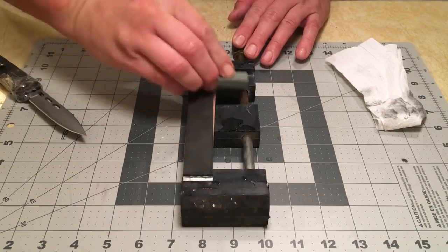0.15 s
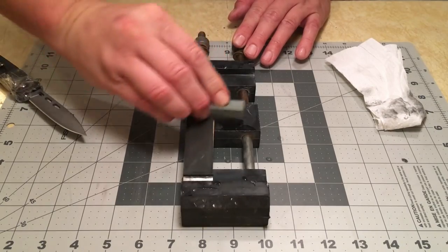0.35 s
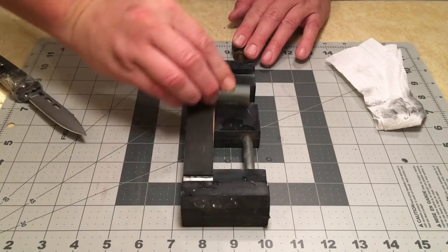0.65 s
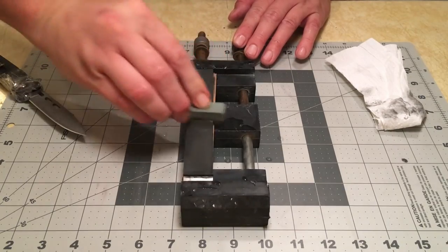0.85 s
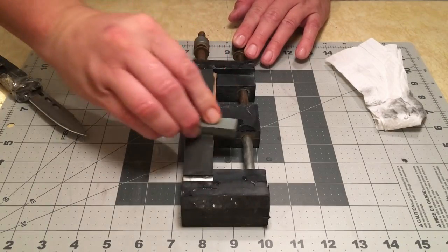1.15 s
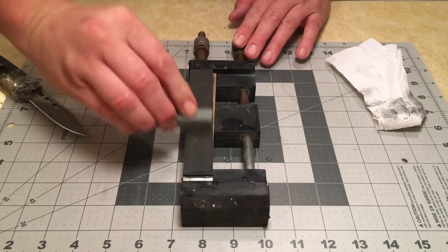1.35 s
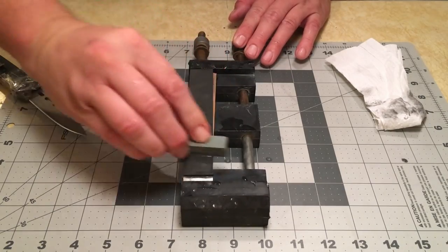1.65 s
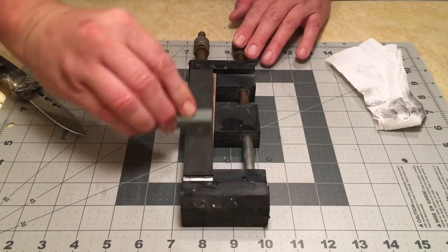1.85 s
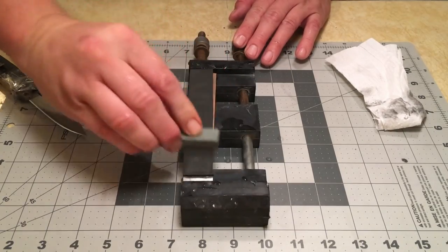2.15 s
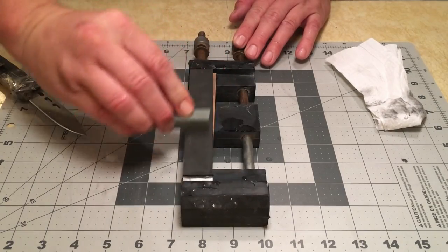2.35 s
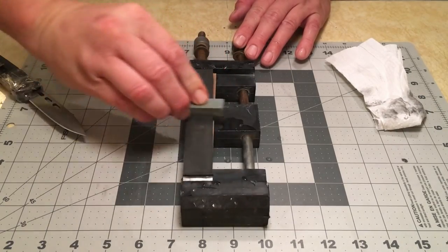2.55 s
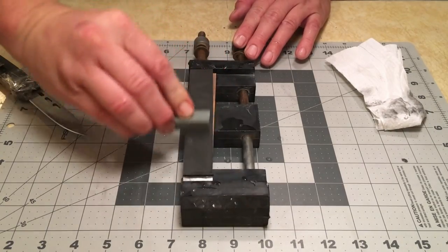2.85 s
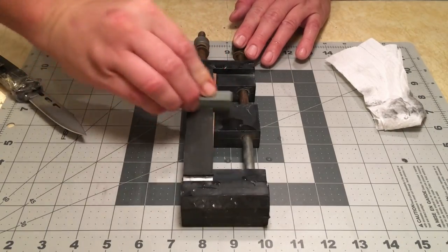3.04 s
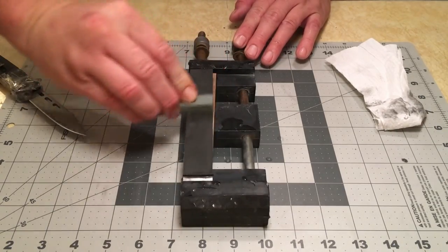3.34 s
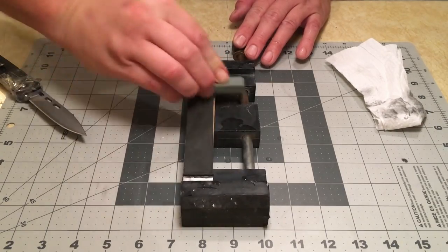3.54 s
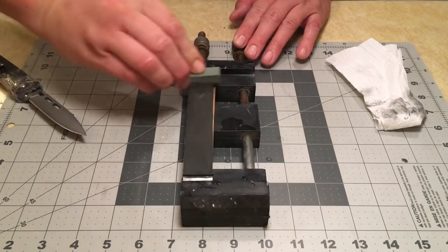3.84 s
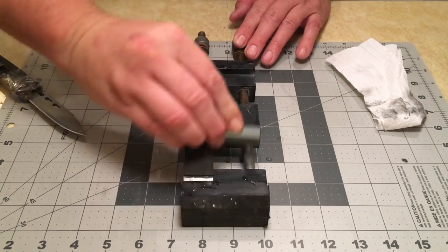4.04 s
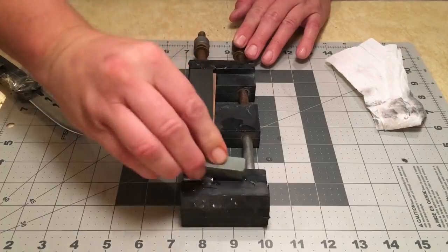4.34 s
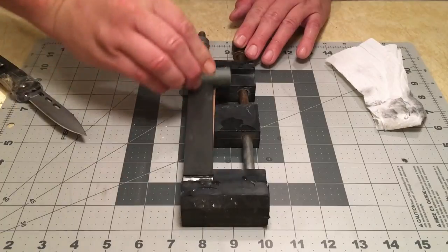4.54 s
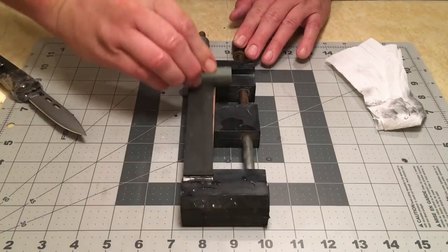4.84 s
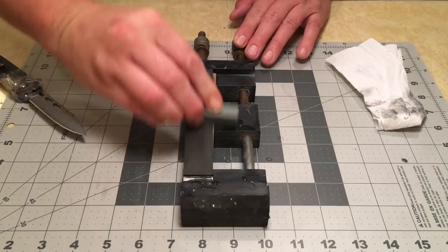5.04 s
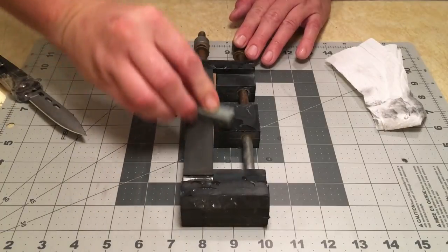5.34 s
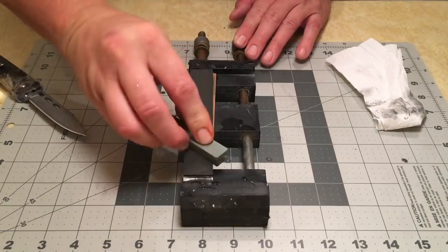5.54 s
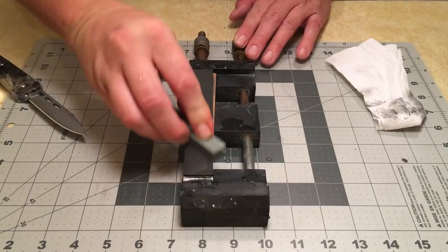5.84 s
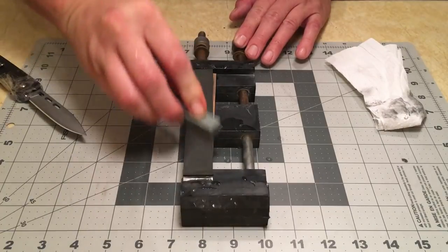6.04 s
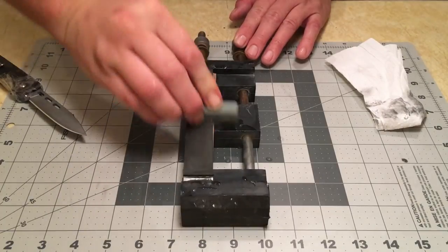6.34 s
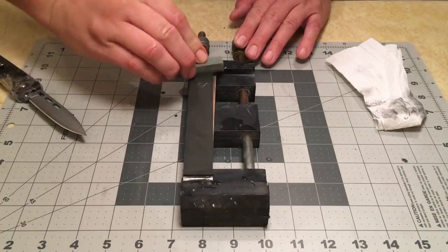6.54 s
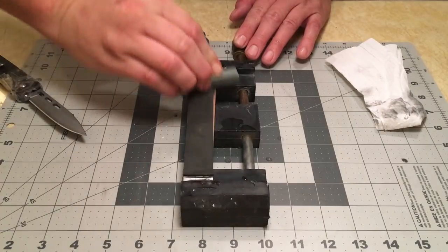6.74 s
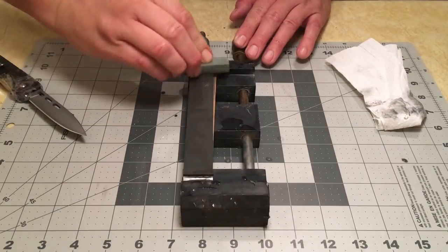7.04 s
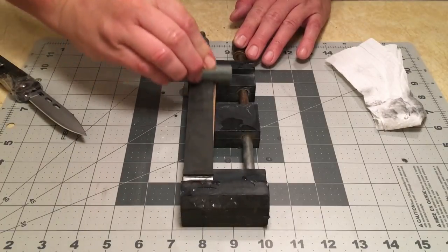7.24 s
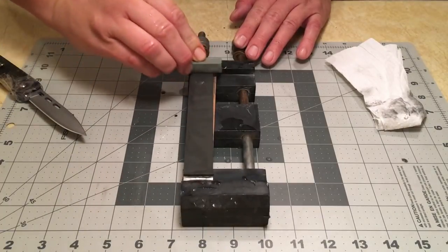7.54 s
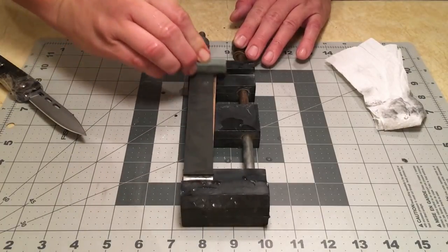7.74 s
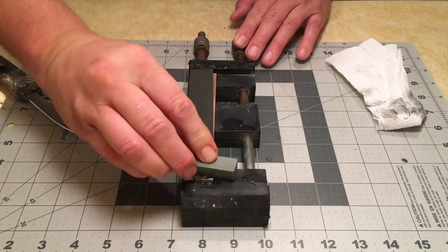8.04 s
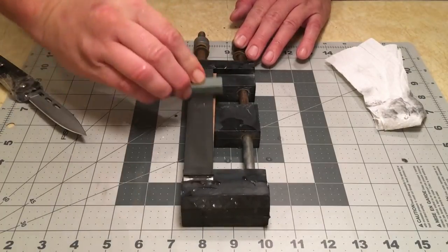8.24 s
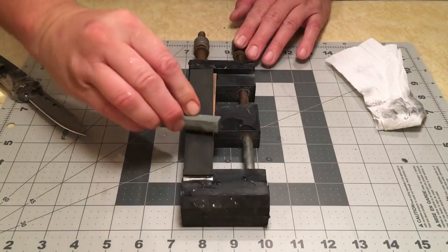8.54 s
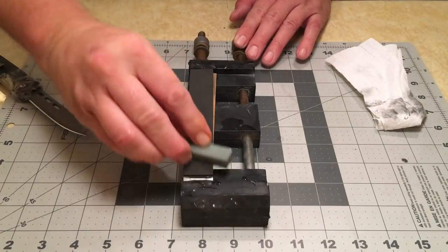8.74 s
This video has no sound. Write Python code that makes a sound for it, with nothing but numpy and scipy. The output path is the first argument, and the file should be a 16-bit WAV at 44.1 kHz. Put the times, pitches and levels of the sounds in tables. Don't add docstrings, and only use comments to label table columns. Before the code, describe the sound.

Close, dry rubbing of a small abrasive block on a gritty metal plate clamped on a table. Small circles make a nearly continuous pulsing rasp, then from about halfway quick back-and-forth strokes chop it into distinct scrapes. The table thumps softly under the pushes; near the end the block knocks the clamp with hard clacks. Quiet room, close microphone, little echo.

```python
import sys
import numpy as np
from scipy import signal
from scipy.fft import rfft, irfft
from scipy.io import wavfile
from scipy.ndimage import uniform_filter1d

SR = 44100
rng = np.random.default_rng(int(sys.argv[2]) if len(sys.argv) > 2 else 0)


def voltage_ratio(decibels):
    exponent = np.asarray(decibels, float) / 20
    return 10 ** exponent


def unload_wav(signal):
    wavfile.write(
        sys.argv[1],
        SR,
        np.round(np.clip(np.atleast_2d(signal).T, -1, 1) * 32767).astype(np.int16),
    )


N = 392034


def evened(x):
    return x / np.sqrt(np.mean(x ** 2) + 1e-20)


def read(points, hz):
    f, value = np.transpose(points)
    return np.interp(np.log(hz + 1), np.log(f + 1), value)


def add(mix, s, sound):
    part = mix[round(s * SR):][:len(sound)]
    part += sound[:len(part)]


def blurred(shape, size):
    z = rng.standard_normal(shape)
    for axis, n in enumerate(size):
        for _ in range(2):
            z = uniform_filter1d(z, n, axis)
    return evened(z)


def clicks(per_s, spread_db):
    chance, size, sign = rng.random((3, N))
    heights = voltage_ratio(spread_db * np.minimum(-np.log(size + 1e-9), 5))
    return evened((chance < per_s / SR) * heights * np.sign(sign - 0.5))


def ring(hz, t60, rise=0.0026, length=0.4):
    t = np.arange(0, length, 1 / SR)
    return voltage_ratio(-60 * t / t60) * np.sin(2 * np.pi * hz * t) * (1 - np.exp(-t / rise))


# (turn [s], drop at the turn [dB],
# rasp level [dB], lean on the holder [dB], skim over the grit tips [dB])
FAR_CIRCLES = [(0.0, 10, -32.5, 1.5, -1), (0.143, 5.5, -35.0, -3, -3.5), (0.24, 3.0, -34.5, -0.5, -1.5),
               (0.387, 5.5, -29.5, -4, 1.5), (0.465, 10, -34, 1.5, -3), (0.66, 6, -31, -15.5, -3.5),
               (0.73, 5, -36.5, 2, 1.5), (0.836, 6, -31, -4, -3), (1.013, 9, -37, 4, -1.5),
               (1.186, 4, -36.5, -6.5, 2.5), (1.288, 5, -36.5, 0.5, 0.5), (1.413, 6, -35.0, -2, 1.5)]
MID_CIRCLES = [(1.567, 6, -36, -1, 0), (1.847, 7.6, -37.0, 0.5, 1), (2.099, 7.9, -35.5, -3, -0.5),
               (2.316, 3.9, -39.5, 3.5, 1.5), (2.448, 2.9, -36.5, 0, 3), (2.616, 6, -38.5, 1, -1),
               (2.698, 2.2, -38.0, 0, 2.5), (2.845, 6.4, -39.5, 1, 1), (2.948, 0.99, -37.5, -3, 3),
               (3.097, 8.6, -35, -3, -0.5), (3.372, 9.7, -33.5, -4, -1.5), (3.584, 9.7, -33, -3.5, 1.0),
               (3.723, 4.9, -34.5, -4, 1), (3.873, 10.5, -31, -3.5, 1.5), (3.982, 8.3, -30.5, -3.5, 1),
               (4.133, 10, -32, -0.5, 1.5), (4.235, 2, -33.5, 1.5, 0), (4.308, 6.2, -35.5, -2, 2.5)]
LONG_STROKES = [(4.467, 9.7, -40.5, 4, 5), (4.634, 3.5, -35.5, 0, -1.5), (4.786, 30, -38, 3, 4),
                (4.939, 18.0, -34, -0.5, -1.0), (5.095, 25, -35.5, 0.5, 2.5), (5.242, 17, -33.5, -4, -0.5),
                (5.39, 22.0, -36, 0.5, 2), (5.536, 27.0, -33, -2, 0), (5.675, 21, -34, 0, 3),
                (5.806, 27, -33, -2.5, 0.5), (5.946, 25, -34, -2.0, 2), (6.086, 18, -34, -3.0, 2.5),
                (6.231, 23, -33.5, 0, 2), (6.38, 30.0, -34, -3, -0.5), (6.519, 37, -36.5, 0, 2),
                (6.666, 44, -34.5, 0, -0.5), (6.797, 12, -30.5, -2.5, -4.5), (6.931, 31, -37.5, 2.5, -0.5),
                (7.055, 17, -36, 5, -0.5), (7.192, 15.0, -33.5, -1, -1.5)]
END_STROKES = [(7.308, 65, -35.5, 11, 3), (7.427, 29.0, -30.5, -1.5, -3.5), (7.547, 68, -33.5, 6, -0.5),
               (7.668, 40.0, -32, -2, -3), (7.786, 39.0, -32.5, 4.5, -1), (7.913, 39.0, -35.5, -0.5, -4.5),
               (8.035, 0.7, -33.5, -2.5, 3.0), (8.167, 17, -33, 1, -1.5), (8.347, 23, -35.5, -4, -1),
               (8.536, 29, -31.5, 2, 1), (8.684, 56, -35, 1.5, 1.5), (8.818, 17, -39, 10.5, 3.5)]


def strokes(t):
    s, _, *controls = np.transpose(FAR_CIRCLES + MID_CIRCLES + LONG_STROKES + END_STROKES)
    lengths = np.diff(s, append=N / SR)
    settle = 0.2
    held = np.ravel([s + settle * lengths, s + (1 - settle) * lengths], "F")
    return [np.interp(t, held, np.repeat(c, repeats=2)) for c in controls]


# (slowing [s], picking up [s])
TURNING = [
    (0.079, 0.019),
    (0.059, 0.067),
    (0.019, 0.012),
    (0.049, 0.017),
]


def slowing_db(t):
    out = np.zeros(len(t))
    for passage, (before, after) in zip((FAR_CIRCLES, MID_CIRCLES, LONG_STROKES, END_STROKES), TURNING):
        for s, drop_db, *_ in passage:
            moving = np.tanh(np.maximum(s + 0.00088 - t, 0) / before) ** 2.68
            freed = np.exp(-np.maximum(t - s - 0.002, 0) / after)
            depth = 1 - voltage_ratio(2 * (2.6 - abs(drop_db)))
            out += 10 * np.log10(1 - depth * (1 - moving) * freed + 1e-6)
    return out


# (time [s], closeness to mid plate [0-1])
MIDDLE = [
    (0, 0.45),
    (1.2, 0.06),
    (1.6, 0.88),
    (3.6, 1),
    (4.2, 0.4),
    (6.6, 0.55),
    (7.0, 0.26),
    (8.89, 0.54),
]


def mid_plate(t):
    middle = np.interp(t, *np.transpose(MIDDLE))
    return middle, middle * (t < LONG_STROKES[0][0])


# (frequency [Hz], level [dB per Hz])
GRIT = [(260, -56), (450, -40), (979, -24.5), (1220, -24.5), (1680, -21), (2330, -8), (2870, -14),
        (4230, -8), (5540, -12), (8290, 2), (9340, -5.5), (15100, -11), (16000, -43)]
# (frequency [Hz], width [Hz], level [dB], extra level with the block at mid plate [dB])
PLATE = [(704.4, 116, 15.5, -2), (1170, 102, 14, -2.5), (1491, 50, 13.5, -6.5), (1778, 16, 14, 5),
         (2130, 82, -5, 6), (2450, 69, -2, -8.5), (3420, 630, 1, 2), (3970, 120, -8.5, 17),
         (4400, 260, -0.5, 8), (5010, 120, -3.5, 1.5), (5230, 140, 8, -7), (6260, 250, 4, -2),
         (6805, 335, 8, -5), (7540, 147, 2, 3.5), (7730, 110, -5.5, -6), (7980, 330, 3, -1.5),
         (8570, 130, 3.5, -4.5), (10480, 450, -7.5, 8), (14000, 1300, 1.5, -11.5), (15620, 440, 21, -14)]


def grit_colour(hz, middle):
    field = read(GRIT, hz)[:, None]
    for f, width, db, more_db in PLATE:
        field = field + (db + more_db * middle) / (1 + (2 * (hz[:, None] - f) / width) ** 2)
    return field


def rasp():
    fine = np.arange(0, N / SR, 0.001)
    loss_db = uniform_filter1d(slowing_db(fine), size=7)
    drive = clicks(14000, 2.04) * voltage_ratio(0.69 * np.interp(np.arange(N) / SR, fine, loss_db))
    hz, t, z = signal.stft(drive, SR, nperseg=512, noverlap=448)
    level, lean, skim = strokes(t)
    middle, circling = mid_plate(t)

    field = grit_colour(hz, middle)
    bright = (hz > 5500) & (hz < 10000)
    field += level - 10 * np.log10(np.sum(voltage_ratio(2 * field)[bright], 0) / len(hz))

    plate = -(middle - 0.4) + 0.28 * lean - 0.14 * (level + 35)
    plate += circling * (np.interp(t - 0.012, fine, loss_db) + 2.63)
    for share, edges in ((lean + 1.7, [300, 400, 1460, 2310]),
                         (plate, [1660, 2130, 5500, 6500]),
                         (skim + 0.1, [9050, 9700, 20000, 21000])):
        field += np.interp(hz, edges, [0, 1, 1, 0])[:, None] * share

    tilt = read([(700, -0.75), (2000, -0.37), (7000, 0.43), (14000, 0.97)], hz)[:, None]
    field += tilt * np.interp(t, fine, loss_db) * (1 - 0.54 * circling)

    field += 1.9 * blurred(z.shape, size=(2, 60))
    field += 1.5 * blurred(z.shape, size=(6, 20))
    calm = 1 - 0.6 * circling
    field += calm * 1.6 * blurred((len(t),), size=(12,))
    field += calm * 1.64 * blurred(z.shape, size=(36, 14))
    return voltage_ratio(-1.32) * signal.istft(z * voltage_ratio(field), SR, nperseg=512, noverlap=448)[1][:N]


# (frequency [Hz], level [dB], t60 [s])
TABLE = [(54.8, -8.5, 0.41), (87.7, 2, 0.13), (114.2, 2.5, .16), (150, -1.5, 0.24), (296.5, 0.5, 0.11),
         (333.7, 0, 0.056), (377.2, -1, 0.092), (494, -10, 0.087), (638, -10.5, 0.092)]
# (time [s], peak level [dB], lowest mode [dB])
PUSHES = [(0.53, -50, -12), (1.271, -52, -20), (1.549, -61, -22), (1.721, -50, -19), (2.201, -48.5, -20),
          (2.714, -47, -26), (2.949, -46, -15), (3.209, -46, -20), (3.288, -46, -23), (3.572, -48, -12),
          (4.471, -45, -8), (4.531, -55, -12), (3.465, -42.5, -25), (3.756, -44, -7), (3.975, -40, -26),
          (4.279, -50, -20), (4.781, -42.5, -8), (5.094, -44.5, -3), (5.24, -52, 5.5), (5.377, -42, -3.5),
          (5.674, -38, -6), (5.812, -39.5, -4), (5.954, -42, -8), (6.091, -52, -2), (6.221, -50, 1.5),
          (6.376, -35.5, -20), (6.514, -43, -6), (6.668, -41.5, -9), (6.788, -45.5, -7), (8.156, -48, -17)]
# (time [s], peak level [dB], upper modes [dB])
BUMPS = [(1.055, -45, -11), (6.919, -38, -8.5), (7.308, -50, -14), (7.344, -48, 5), (7.368, -37, -14),
         (7.394, -23.5, -6.5), (7.429, -36, -25), (7.867, -39.5, -16), (7.883, -36, -2), (7.932, -36, -9),
         (8.495, -30.5, -9), (8.544, -36, -1), (8.562, -30.5, -5.5), (8.653, -39.5, -6),
         (8.69, -24.5, -11.5), (8.718, -45, -10), (8.819, -45, -13)]


def thumps():
    out = np.zeros(N)
    # (time, peak dB, lowest dB, second dB, upper dB, share of the free decay); the clamp damps a bump
    blows = [(s, db, low_db, -4, -17, 0.77) for s, db, low_db in PUSHES]
    blows += [(s, db, -33, -12, upper_db, 0.46) for s, db, upper_db in BUMPS]
    detunes = rng.uniform(0.847, 1.13, (len(blows), len(TABLE)))
    for (s, db, low_db, second_db, upper_db, free), detune in zip(blows, detunes):
        shares = np.repeat([low_db + 17.0, second_db, -3, upper_db + 2.5], repeats=[1, 1, 2, 5])
        for (hz, mode_db, t60), share_db, k in zip(TABLE, shares, detune):
            mode = ring(hz * k, free * t60, 0.002 + 45 / hz ** 2)
            add(out, s, voltage_ratio(db + 5.0 + mode_db + share_db) * mode)
    return out


# (time [s], snap level [dB], snap top [Hz], ring level [dB], ring frequency [Hz], t60 [s])
KNOCKS = [
    (0.388, -31, 3000, -34, 1630, 0.036),
    (7.397, -18, 7000, -24, 560, 0.039),
    (8.496, -28.5, 2000, -21.5, 688, 0.079),
    (8.6906, -19.5, 7900, -17, 2225, 0.024),
]


def knocks():
    out, t = np.zeros(N), np.arange(400) / SR
    for s, snap_db, top_hz, db, hz, t60 in KNOCKS:
        band = signal.butter(2, [0.15 * top_hz, top_hz], "band", fs=SR, output="sos")
        snap = signal.sosfilt(band, rng.standard_normal(400))
        add(out, s, voltage_ratio(snap_db - 3 - 60 * t / 0.0085) * evened(snap))
        add(out, s, voltage_ratio(db - 9) * ring(hz, 1.2 * t60, 0.00035))
        ratios = np.sort(np.geomspace(0.55, 2.2, num=16) * rng.uniform(1.0, 1.04, size=16))
        for k in ratios:
            add(out, s, voltage_ratio(db - 19.5) * rng.choice([-1, 1]) * ring(k * hz, t60 / k, 4e-4))
    return out


# (start [s], end [s], level [dB], first [Hz], last [Hz])
GRATES = [(1.012, 1.107, -46, 3400, 1500), (7.309, 7.373, -39, 2850, 1330),
          (7.367, 7.393, -28.5, 9300, 6800), (7.605, 7.63, -33.5, 8400, 7200),
          (0.03, 0.097, -43, 5300, 4900), (7.34, 7.395, -41, 4800, 4000), (7.79, 7.87, -44.5, 2500, 2400),
          (8.545, 8.64, -41.5, 3800, 3400), (1.03, 1.12, -46.5, 490, 305), (8.497, 8.535, -47, 1300, 710),
          (6.905, 6.94, -51, 830, 500), (7.4, 7.45, -53, 860, 600), (7.335, 7.37, -49, 2200, 2600),
          (7.4, 7.42, -42, 4200, 3000), (8.695, 8.76, -47, 2300, 2200)]


def grates():
    out = np.zeros(N)
    for start, end, db, first_hz, last_hz in GRATES:
        n = round((end - start) * SR)
        turn = np.exp(2j * np.pi * np.cumsum(np.geomspace(first_hz, last_hz, n)) / SR)
        b, a = signal.butter(2, 0.13 * first_hz, fs=SR)
        band = (turn * signal.lfilter(b, a, clicks(6700, 0.91)[:n] / turn)).real
        add(out, start, voltage_ratio(db) * evened(band) * signal.windows.tukey(n, 0.4))
    return out


def shake():
    t, drag = np.arange(N) / SR, clicks(300, 3.0)
    rasp_db, lean, _ = strokes(t)
    middle, circling = mid_plate(t)
    modes = []
    for hz, db, t60 in TABLE:
        modes.append(voltage_ratio(db) * evened(signal.oaconvolve(drag, ring(hz, t60))[:N]))

    coarse = t[::64]
    loss_db = np.interp(t - 0.03, coarse, np.maximum(slowing_db(coarse), -12))
    level_db = -54.5 + 0.3 * lean + 0.41 * (rasp_db + 39.5)
    level_db += (0.11 + 0.65 * circling) * loss_db
    level_db += 2 * blurred((N,), size=(2000,))
    level = voltage_ratio(level_db)
    judder = np.exp(-(t[:SR // 4] / 0.038) ** 2)
    for s, db, _ in PUSHES + BUMPS:
        add(level, s, voltage_ratio(db - 6) * judder)

    upper = voltage_ratio(-59 + 0.69 * (rasp_db + lean + 34.5)) * (level / voltage_ratio(-56.5)) ** 0.52
    low_modes = sum(modes[:3]) + voltage_ratio(5.1 * middle) * modes[3]
    return level * evened(low_modes) + upper * evened(sum(modes[4:]))


# (frequency [Hz], level [dB per Hz])
ROOM = [
    (30, 2),
    (200, 4.5),
    (1000, -23.5),
    (16000, -12.5),
]


def room():
    hz = np.fft.rfftfreq(N, 1 / SR)
    air = irfft(rfft(rng.standard_normal(N)) * voltage_ratio(read(ROOM, hz)), N)
    return voltage_ratio(-56.5) * evened(air)


def walls(near):
    t = np.arange(0.004, 0.25, 1 / SR)
    tail = np.r_[np.zeros(176), rng.standard_normal(len(t)) * voltage_ratio(-60 * t / 0.25)]
    return voltage_ratio(-18) * signal.oaconvolve(near, tail / np.linalg.norm(tail))[:N]


def scene():
    near = rasp() + thumps() + knocks() + grates()
    return np.tile(near + walls(near) + shake() + room(), (2, 1))


def band_limit(x):
    return signal.sosfilt(signal.butter(12, 16560, fs=SR, output="sos"), x)


def record(dry):
    cut = signal.sosfilt(signal.butter(4, 40, "high", fs=SR, output="sos"), dry)
    edge = signal.firwin(801, 15780, window=("kaiser", 9), fs=SR)
    mix = signal.oaconvolve(cut, edge[None], "same")
    return band_limit(mix)


dry = scene()
out = record(dry)
unload_wav(out)
```